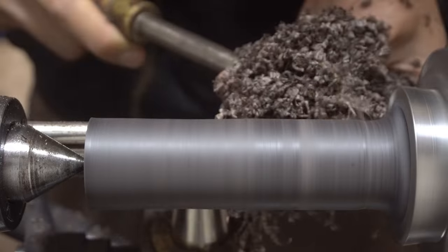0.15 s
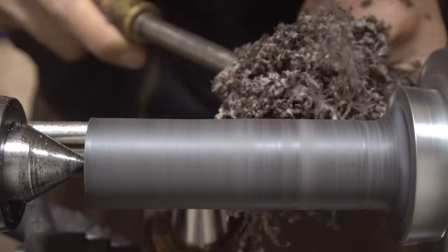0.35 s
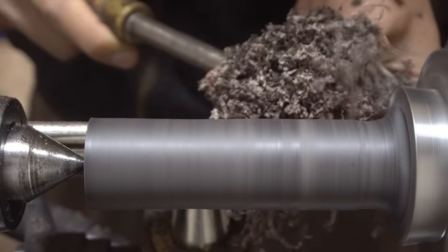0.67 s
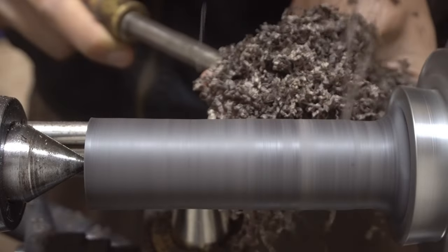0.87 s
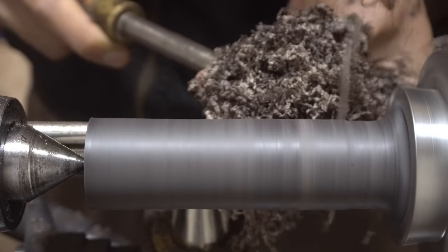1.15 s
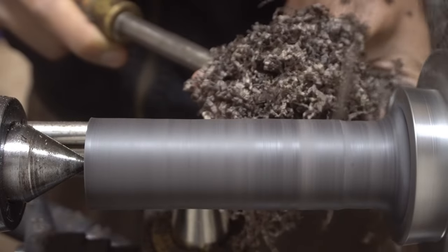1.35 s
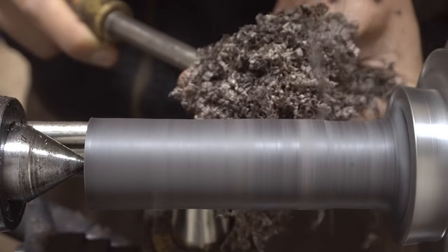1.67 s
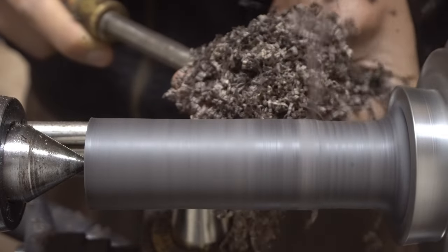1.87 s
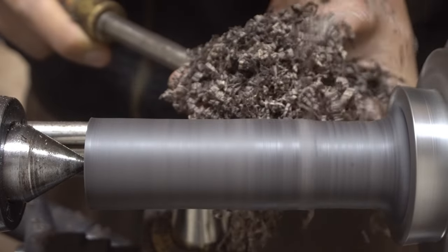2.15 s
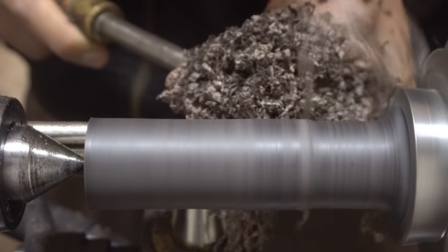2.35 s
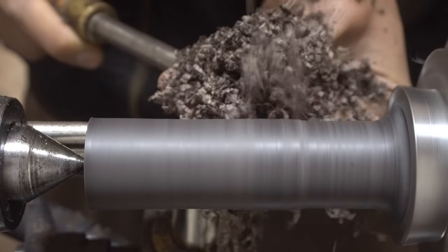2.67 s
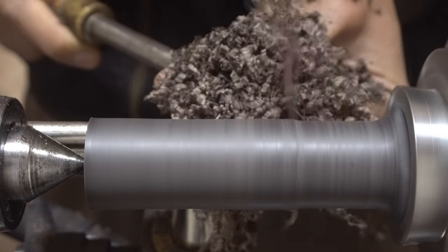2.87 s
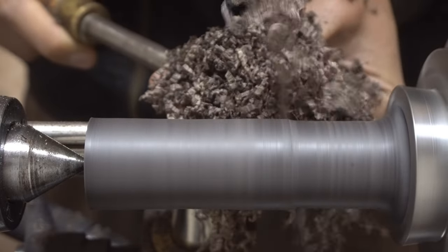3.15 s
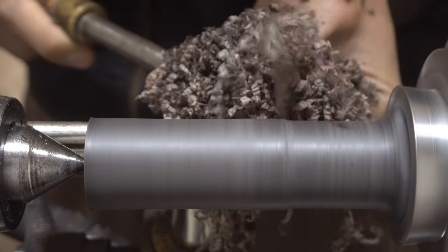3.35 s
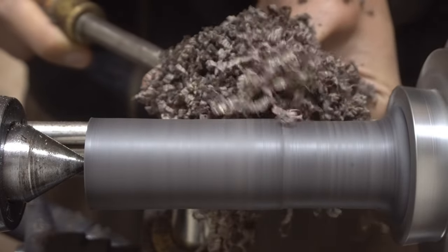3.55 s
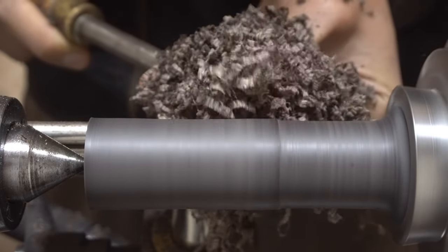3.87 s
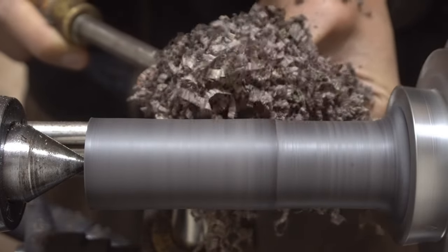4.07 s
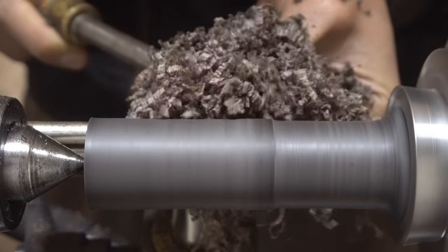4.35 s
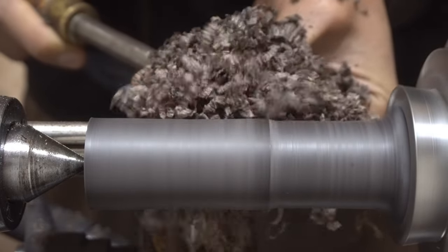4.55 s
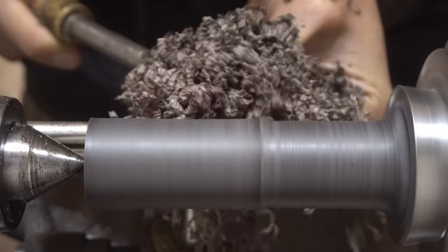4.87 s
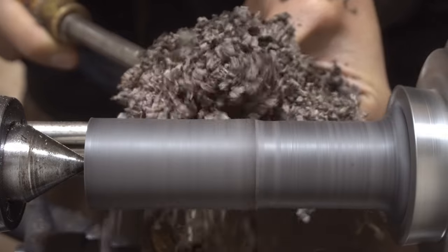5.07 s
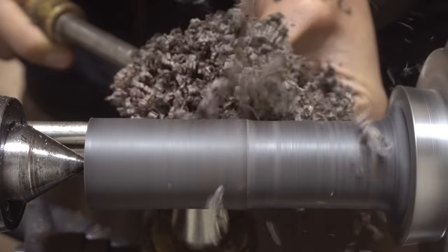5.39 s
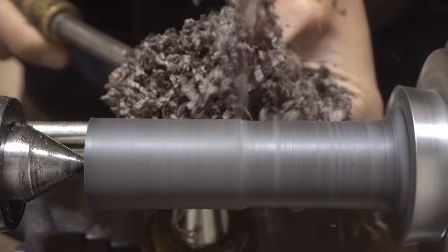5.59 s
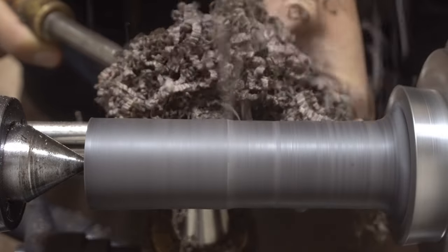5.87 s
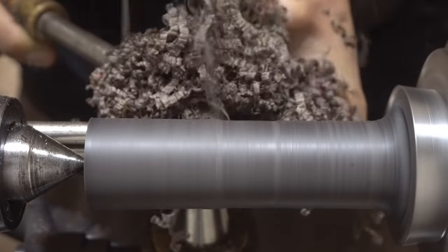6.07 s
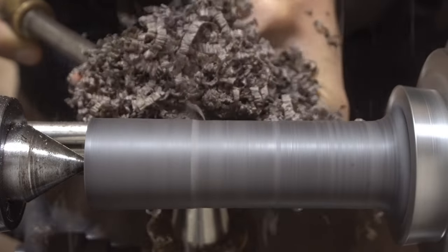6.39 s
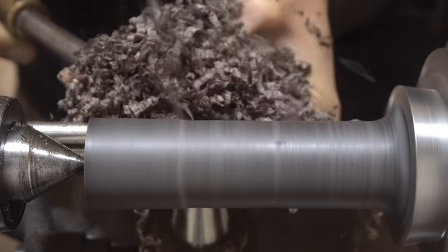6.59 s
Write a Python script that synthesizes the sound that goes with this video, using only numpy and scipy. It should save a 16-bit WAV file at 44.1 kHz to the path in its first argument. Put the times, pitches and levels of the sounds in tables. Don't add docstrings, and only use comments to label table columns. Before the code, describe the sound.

Close, piercing hiss of wood being turned on a lathe, with rapid buzzing crackle, wavering metallic whistles and a quiet low machine hum.

```python
import sys
import numpy as np
from scipy import signal
from scipy.fft import rfft, irfft
from scipy.io import wavfile
from scipy.ndimage import uniform_filter1d, map_coordinates

SR = 44100
rng = np.random.default_rng(int(sys.argv[2]) if len(sys.argv) > 2 else 0)


def log_audio(samples):
    frames = np.atleast_2d(samples).T
    limited = np.clip(frames, -1, 1)
    pcm = np.round(limited * 32767).astype(np.int16)
    wavfile.write(sys.argv[1], SR, pcm)


def linear_from_db(decibels):
    return 10 ** (np.asarray(decibels, float) / 20)


N = 296791
TIME = np.arange(N) / SR

# time_s, likeness_share (0-1)
LIKENESS = [(0, 0.44), (.32, 0.83), (1.28, 0.82), (1.6, 0.71), (2.7, 0.95), (3.1, 0.97), (4.16, 0.88),
            (4.75, 0.68), (4.96, 1), (5.76, 0.73), (6.24, 0.7), (6.73, 0.72)]
# time_s, place (0-4)
EDGE_PLACE = [(0, 0), (.9, 0), (1.35, 1), (2.1, 1), (2.7, 2), (4.4, 2), (4.58, 3), (5.5, 3), (6.0, 3.6),
              (6.45, 3.6), (6.65, 4), (6.73, 4)]


def curve(table):
    time_s, value = np.transpose(table)
    return np.interp(TIME, time_s, value)


def at_place(levels_db):
    return np.interp(curve(EDGE_PLACE), np.arange(len(levels_db)), levels_db)


def steady(x, span_s):
    span = int(span_s * SR)
    power = uniform_filter1d(uniform_filter1d(x ** 2, span), span)
    return x / np.sqrt(power + 1e-18)


def ring(x, hz, width_hz):
    return signal.lfilter(*signal.iirpeak(min(hz, .45 * SR), hz / width_hz, fs=SR), x)


def double_ring(x, hz, width_hz):
    return ring(ring(x, hz, width_hz), hz, width_hz)


def drone(hz, width_hz, span_s):
    return steady(double_ring(rng.standard_normal(N), hz, width_hz), span_s)


def walk(rate_hz):
    hold = int(SR / rate_hz)
    levels = np.repeat(rng.standard_normal(N // hold + 1), hold)
    return 1.985 * uniform_filter1d(uniform_filter1d(levels, hold), hold)[:N]


def bumps(table):
    return sum(db * np.exp(-.5 * ((TIME - s) / half_s) ** 2) for s, db, half_s in table)


def spell(start_s, length_s, fade_s):
    end_s = start_s + length_s
    span = slice(max(int((start_s - fade_s) * SR), 0), int((end_s + fade_s) * SR))
    to_edge_s = np.minimum(TIME[span] - start_s, end_s - TIME[span])
    return span, np.clip(to_edge_s / fade_s + .5, 0, 1)


def tones(rows, cycles, fade_s, waver_db, waver_rad, rate_hz):
    out, level, drift = np.zeros(N), walk(rate_hz), walk(1.3 * rate_hz)
    for (start_s, length_s, multiple, db), (turn, skip) in zip(rows, rng.random((len(rows), 2))):
        span, gate = spell(start_s, length_s, fade_s)
        own = (np.arange(N)[span] - int(skip * N)) % N
        wave = np.sin(2 * np.pi * (multiple * cycles[span] + turn) + waver_rad * drift[own])
        out[span] += np.sqrt(2) * linear_from_db(db + waver_db * level[own]) * gate * wave
    return out


def fan():
    # frequency_hz, density_db
    air_spectrum = [(30, -12), (60, -33), (150, -2), (300, -16), (400, -16), (800, -8), (1250, -13.5),
                    (2200, -12.5), (3500, -7), (8000, -13.5), (16000, -21.5)]
    hz, db = np.transpose(air_spectrum)
    shape = linear_from_db(np.interp(np.log(np.fft.rfftfreq(N, 1 / SR) + 1), np.log(hz), db))
    air = irfft(rfft(rng.standard_normal(N)) * shape, N)
    return air / air.std() * linear_from_db(-41)


def guard():
    # frequency_hz, width_hz, level_db
    guard_modes = [(59, 40, -51.5), (147.3, 22, -54), (310.5, 29.5, -57), (463.5, 11, -61.5),
                   (1252, 36, -56), (3375, 43, -51.5)]
    shake = rng.standard_normal(N)
    return sum(linear_from_db(db + 1.65 * walk(3.2)) * steady(double_ring(shake, hz, width_hz), 0.62)
               for hz, width_hz, db in guard_modes)


def panels():
    # start_s, length_s, frequency_hz, level_db
    buzzes = [(2.6, 0.4, 504, -58), (2.906, 0.5, 107, -45.5), (3.55, 0.64, 80.5, -51),
              (3.6, 0.35, 377, -57.5), (3.8, 0.39, 482, -59), (4.056, 0.31, 55, -46),
              (4.747, .5, 62.5, -51.5), (5.4, 0.58, 111, -47.5), (5.795, 0.14, 51.7, -45),
              (5.903, 0.99, 370, -62), (6.202, .6, 85.5, -49)]
    out = linear_from_db(-55 + 2.0 * walk(6)) * drone(233.5, 23, 0.094)
    for start_s, length_s, hz, db in buzzes:
        span, gate = spell(start_s, length_s, fade_s=0.1)
        out[span] += linear_from_db(db) * gate * drone(hz, 8.3, 0.058)[span]
    return out


def bench():
    # time_s, swell_db, half_width_s
    shudders = [
        (.01, 7.5, 0.13),
        (2.4, 3, 0.048),
        (3.25, 11, 0.31),
        (3.95, 4.5, 0.054),
        (4.2, 4, .1),
        (5.65, 4, 0.35),
        (6.4, -4, 0.32),
    ]
    # start_s, length_s, frequency_hz, level_db
    hums = [(-.1, 0.9, 249.3, -50), (.23, 0.077, 181, -33), (.35, 0.61, 173.1, -45.5),
            (.85, 0.38, 178, -61), (1.0, 1.48, 185.9, -41), (1.0, 0.71, 244, -47.5),
            (1.3, 0.4, 171.6, -46.5), (1.4, 0.93, 141, -62), (1.9, 0.54, 168.6, -47),
            (2.28, 0.14, 234, -47.5), (2.5, 0.31, 179.3, -53), (2.85, 0.5, 188.5, -39.5),
            (2.9, 0.4, 149, -51), (3.25, 0.29, 172.3, -46.5), (3.45, 0.32, 182, -42.5),
            (3.5, 1.12, 197, -46.5), (4.0, 0.42, 180.7, -43.5), (4.35, 0.5, 176.9, -44),
            (4.68, 0.26, 234, -48.5), (4.9, .8, 212, -56), (4.98, 0.84, 171.4, -39.5),
            (5.72, 0.554, 186, -41.5), (6.1, 0.45, 178.3, -43), (6.45, .4, 182, -44)]
    shudder_db = bumps(shudders)
    rumble = linear_from_db(shudder_db - 53 + 1.3 * walk(9)) * drone(101, 135, 0.076)
    rattle = linear_from_db(0.72 * shudder_db - 53.5 + .5 * walk(7)) * drone(604, 900, 0.14)
    boom = linear_from_db(-49 + 1.0 * walk(7.5)) * drone(180.5, 30, 0.092)
    hum = tones(hums, TIME, 0.086, waver_db=1.28, waver_rad=0.45, rate_hz=7.0)
    return hum + boom + rumble + rattle


def bearings():
    # frequency_hz, level_db
    whines = [(1211, -57.0), (1346, -56.0), (1685, -63), (2929, -54.5), (3095, -53.0), (7434, -48.0)]
    return sum(np.sqrt(2) * linear_from_db(db + 0.82 * walk(8.6)) * np.sin(2 * np.pi * hz * TIME + 0.53 * walk(8))
               for hz, db in whines)


def spindle_half_turns():
    # time_s, speed_rpm
    spindle_speed = [(0, 3467.5), (.48, 3466.8), (.96, 3465.6), (1.44, 3466.6), (1.92, 3468), (2.4, 3468.3),
                     (3.6, 3467.4), (4.32, 3468), (4.8, 3467.1), (5.28, 3467.7), (6.73, 3468)]
    return np.cumsum(curve(spindle_speed) / 30 / SR)


def bites():
    # time_s, jump_db
    force_jumps = [(0.3394, 0), (0.9692, -4), (1.25, -1), (1.487, -2), (1.6394, -1), (1.7294, 1),
                   (1.8244, 0), (2.0494, 2), (2.1644, 4), (2.5067, 7.5), (2.5425, 3), (3.6845, 5.5),
                   (3.7015, 3), (4.3734, 1), (4.5244, 6), (4.5764, 2), (4.6633, 6), (4.7434, -5),
                   (5.7954, 5), (5.898, 3), (6.0544, 1), (6.1489, 4), (6.2794, -2), (6.4494, -4),
                   (6.714, 2)]
    relax_s = 0.0087
    time_s, jump_db = np.transpose(force_jumps)
    kicks = np.zeros(N)
    kicks[(time_s * SR).astype(int)] = jump_db
    return signal.lfilter([1], [1, -np.exp(-1 / (relax_s * SR))], kicks)


def part_db(share):
    # time_s, hiss_db
    hand_pressure = [(0.0, -40), (0.06, -47), (0.11, -32), (0.35, -26.5), (0.6, -26), (1.1, -24.5),
                     (1.4, -21.5), (2.05, -23.5), (2.27, -28.5), (2.7, -24.5), (3.4, -25), (3.95, -30),
                     (4.12, -26.5), (4.5, -29), (4.9, -26), (5.5, -26.5), (5.9, -25), (6.73, -24)]
    # time_s, swell_db, half_width_s
    hand_surges = [(0.289, -4.5, 0.025), (0.569, 4.5, 0.019), (0.753, 4, 0.023), (0.828, 7, 0.027),
                   (1.033, 3.5, 0.022), (1.357, 3.5, 0.02), (1.616, -6, 0.012), (1.671, 2, 0.041),
                   (1.776, -5.5, 0.024), (1.851, 5, 0.024), (2.11, -3.5, 0.027), (2.415, 3, 0.075),
                   (2.519, 5, 0.016), (2.594, -3, 0.024), (3.143, -3, 0.023), (3.447, 2.5, 0.016),
                   (3.702, 3.5, 0.011), (4.385, 4, 0.012), (4.585, 4.5, 0.025), (4.689, 3.5, 0.052),
                   (4.744, 5, 0.013), (4.799, -6, 0.013), (5.742, -2, 0.022), (5.937, -3.5, 0.01),
                   (6.001, -5, 0.034), (6.111, -6, 0.02), (6.321, -4, 0.012), (6.455, 6, 0.014),
                   (1.512, 4, 0.011), (6.515, -1, 0.016)]
    # time_s, swell_db, half_width_s
    small_swells = [(0.156, -0.5, 0.025), (0.587, 1, 0.0092), (0.884, 1.5, 0.016), (1.141, -1, 0.012),
                    (1.363, 0.5, 0.025), (1.666, 0.5, 0.01), (1.922, -1.5, 0.018), (2.917, 0.9, 0.025),
                    (3.197, 0.1, 0.045), (3.488, -1, 0.041), (3.62, 1.5, 0.016), (3.718, -0.5, 0.025),
                    (4.177, -1, 0.021), (4.334, -1.5, 0.027), (4.572, 1, 0.016), (4.705, 0.5, 0.025),
                    (4.791, 2.2, 0.01), (4.897, -1, 0.016), (5.037, -2, 0.025), (5.134, -1.7, 0.021),
                    (5.585, 1, 0.028), (5.675, 2, 0.01), (6.12, -2.5, 0.016), (6.509, -1.5, 0.01),
                    (6.571, -2, 0.01), (6.722, -0.5, 0.012), (6.59, 0.5, 0.016), (6.655, 1, 0.018)]
    # time_s, roll_db
    gouge_roll = [(0, 3), (.6, 0.5), (1.0, -0.5), (1.5, 2.5), (1.85, -1), (2.05, 0), (2.5, -1.3),
                  (2.85, -1), (3.25, -0.1), (3.7, -0.5), (4.0, 1.5), (4.2, -3), (4.75, -1.2), (5.0, 0.5),
                  (5.6, 1), (6.1, 3), (6.5, -1), (6.73, -1)]
    surge_share, roll_share, *place_db = share
    surge_db = bumps(hand_surges) + bumps(small_swells)
    return curve(hand_pressure) + surge_share * surge_db + roll_share * curve(gouge_roll) + at_place(place_db)


def singing():
    shaft_multiples = [29, 60, 79, 74, 53, 30, 78, 52, 53, 29, 66, 60, 58, 31, 48, 78, 30, 36, 74, 65, 52,
                       53, 31, 35, 36, 60, 30, 52, 53, 29, 60, 35, 79, 52, 53, 78, 29, 79, 34, 78, 52, 36,
                       79, 50, 48, 70, 36, 53, 47, 61, 52, 80, 49, 90, 52, 47]
    # start_s, length_s, level_db (above the pressure)
    shaft_spells = [(0.01, 1.05, -20), (0.17, 0.72, -20), (0.23, 0.5, -18), (0.31, 0.46, -13),
                    (0.347, 0.78, -21.1), (0.47, 0.6, -23.5), (0.488, 0.62, -10.5), (1.15, 0.38, -11.5),
                    (1.55, 0.43, -11), (1.03, 1.35, -28), (1.033, 0.56, -17), (1.15, 1.02, -21.5),
                    (1.19, 0.5, -25), (1.416, 0.77, -22), (1.43, 0.63, -17.5), (1.51, 0.56, -13),
                    (1.53, 0.73, -46), (1.848, 0.51, -20.5), (1.67, 1.06, -22), (1.75, 0.59, -23.4),
                    (1.85, 0.6, -17.5), (1.91, 0.98, -18), (2.09, 0.66, -20.5), (2.21, 1.3, -19.5),
                    (2.35, 0.55, -21), (2.29, 0.58, -19), (2.347, 0.94, -33), (2.49, 0.7, -16.5),
                    (2.83, 0.67, -16), (2.85, 1.2, -22), (2.91, 0.99, -27), (3.07, 1.1, -23.5),
                    (3.11, 0.5, -16), (3.33, 0.87, -19.5), (3.39, 0.63, -14.5), (3.45, 0.99, -28),
                    (3.73, 0.88, -20), (3.89, 0.56, -13), (3.89, 0.99, -27), (4.25, 1, -26),
                    (4.433, 0.34, -16), (4.68, 0.61, -18.5), (4.67, 0.74, -14), (4.81, 0.45, -13),
                    (5.17, 0.74, -30), (5.35, 0.58, -12), (5.4, 0.8, -19), (5.69, 0.59, -18.5),
                    (5.73, 0.76, -19), (6.018, 0.48, -24), (0.42, 0.67, -17), (0.44, 0.24, -5.5),
                    (1.25, 0.25, -19), (0.64, 0.22, -16), (2.614, 0.19, -16), (6.22, 0.31, -17)]
    more_shaft_multiples = [36, 33, 31, 34, 32, 59, 52, 48, 40, 29, 29, 29, 35, 35, 31, 70, 34]
    # start_s, length_s, level_db (above the pressure)
    more_shaft_spells = [(6.25, 0.36, -13), (6.6, .3, -11), (6.58, .3, -13), (7.5, .3, -21), (6.6, .3, -14),
                         (6.5, .3, -15), (7.1, .25, -10), (5.85, 0.36, -12), (6.06, .3, -20), (1.14, 0.29, -17.5),
                         (4.2, 0.29, -17.5), (5.33, .3, -20.5), (1.56, 0.63, -25.5), (5.0, 1.08, -19.5),
                         (4.25, 0.56, -23.5), (5.3, .35, -22), (3.3, .8, -26)]
    edge_multiples = [112, 120, 97, 121, 120, 100, 112, 102, 131, 125, 111, 112, 121, 103, 90, 111, 112,
                      100, 125, 133, 90, 133, 126, 126, 126, 130, 131, 130]
    # start_s, length_s, level_db (above the pressure)
    edge_spells = [(0.29, 0.87, -16), (0.57, 0.51, -19), (1.09, 0.52, -13.5), (1.31, 0.51, -13),
                   (1.87, 0.45, -10), (1.89, 0.31, -21), (1.97, 0.64, -19.9), (2.01, 0.51, -13),
                   (2.01, 0.44, -14), (2.05, 0.29, -12), (2.25, 0.7, -16), (2.57, 0.64, -21),
                   (2.65, 0.46, -17.2), (2.75, 0.42, -17), (2.77, 0.54, -29), (3.15, 0.52, -19),
                   (3.65, 0.84, -15), (3.75, 0.48, -10), (4.05, 0.48, -18), (4.19, 0.42, -18),
                   (4.53, 1.3, -19), (4.71, 0.52, -14), (4.87, 0.38, -16), (5.55, 0.76, -17),
                   (2.9, 1.3, -16), (0.4, 1.4, -21), (2.5, 1.4, -12), (4.2, 1.1, -14)]
    rest_multiples = [11, 20, 14, 15, 11, 16, 15, 16, 11, 16, 11, 14, 15, 24, 15, 11, 21, 9, 16, 11, 24, 11,
                      11, 12]
    # start_s, length_s, level_db
    rest_spells = [(0.13, 1.1, -58), (0.27, 0.54, -52), (0.39, 0.94, -65), (0.512, 1.03, -53),
                   (0.85, 0.73, -49), (0.993, 0.76, -53), (1.35, 0.89, -56), (1.71, 0.71, -53.5),
                   (1.75, 1.2, -68), (2.47, 0.92, -52), (2.79, 0.98, -52.5), (3.07, 0.45, -62),
                   (3.09, 0.73, -50), (3.09, 0.6, -54), (3.83, 0.61, -49), (3.87, 0.95, -54),
                   (3.89, 0.76, -58), (4.03, 0.83, -56), (4.49, 0.34, -57.5), (4.89, 0.89, -48),
                   (5.13, 0.5, -52), (5.7, 0.6, -53), (6.383, .5, -46), (5.096, .9, -53)]

    def rows(multiples, spells):
        return [(start_s, length_s, k, db) for k, (start_s, length_s, db) in zip(multiples, spells)]

    half_turns, fade_s = spindle_half_turns(), 0.16
    shaft_rows = rows(shaft_multiples, shaft_spells) + rows(more_shaft_multiples, more_shaft_spells)
    edge_rows, rest_rows = rows(edge_multiples, edge_spells), rows(rest_multiples, rest_spells)
    shaft = tones(shaft_rows, half_turns, fade_s, waver_db=1.0, waver_rad=0.5, rate_hz=8.0)
    edge = tones(edge_rows, half_turns, fade_s, waver_db=2.2, waver_rad=1.0, rate_hz=11.0)
    rest = tones(rest_rows, half_turns, fade_s, waver_db=2.1, waver_rad=0.63, rate_hz=6.0)
    fresh = 1 - curve(LIKENESS)
    shaft_db = 0.47 * bites() + 4.5 * fresh * walk(28.15) + 1.03
    edge_db = 0.47 * bites() + 6.0 * fresh * walk(28.15) + 0.8
    hand = linear_from_db(part_db((1, .1, 0, 0, 0, 0, 0)))
    return hand * (linear_from_db(shaft_db) * shaft + linear_from_db(edge_db) * edge) + linear_from_db(-2.0) * rest


def renew(rows, memory):
    for k in range(1, len(rows)):
        rows[k] = memory[k] * rows[k - 1] + np.sqrt(1 - memory[k] ** 2) * rows[k]


def even_overtones(rows, power):
    lines = rfft(rows)
    rows[:] = irfft(lines / np.abs(lines) ** power, rows.shape[1])


def fibres():
    steps = 1024
    half_turns = spindle_half_turns()
    count = int(half_turns[-1]) + 2
    likeness = np.interp(np.arange(count), half_turns, curve(LIKENESS))
    shape = (3, count, steps)
    snaps = rng.standard_normal(shape) * linear_from_db(2.5 * rng.exponential(size=shape))
    ridge, figure = snaps[0], snaps[1]
    renew(ridge, np.clip(likeness / 0.884, .2, .98))
    renew(figure, np.full(count, 0.98))
    even_overtones(figure, 1.14)
    even_overtones(ridge, 0.4)
    snaps /= snaps.std(axis=(1, 2), keepdims=True)
    lean = 2.63 * walk(1.55)[::N // count][:count, None]
    angle = 2 * np.pi * np.arange(steps) / steps
    grain_db = 2.85 * np.cos(angle + lean) + 1.05 * np.cos(2 * angle - lean)
    grain_db = grain_db + 1.94 * np.cos(3 * angle + 2 * lean)
    snaps *= linear_from_db(grain_db)
    smooth = signal.sosfilt(signal.butter(12, .34, output="sos"), snaps.reshape(3, -1))
    shiver_s = 3e-6 * walk(70)
    place = steps * np.interp(TIME + shiver_s, TIME, half_turns)
    return [map_coordinates(row, [place], order=3, mode="nearest") for row in smooth]


def body(force, modes, skirt_db, flicker_db, fill_db):
    lag = int(8 * SR * 30 / 3467.5)
    low_hz, high_hz = modes[0][0], modes[-1][0]
    band = signal.butter(2, [.95 * low_hz, 1.05 * high_hz], "band", fs=SR, output="sos")
    out = linear_from_db(fill_db) * steady(signal.sosfilt(band, np.roll(force, 2 * lag)), .2)
    for k, (hz, width_hz, *place_db) in enumerate(modes):
        once = ring(np.roll(force, k % 2 * lag), hz, width_hz)
        skirt = (-1) ** k * linear_from_db(skirt_db) * once
        tone = steady(ring(once, hz, 1.11 * width_hz) + skirt, 0.094)
        out = out + tone * linear_from_db(at_place(place_db) + flicker_db * walk(6))
    return steady(out, 0.096)


def gouge():
    # frequency_hz, width_hz, then level_db at each of five places along the blank
    edge_modes = [(11350, 53, -3, -3.5, -5, -15, -10), (11760, 400, 1, 2.5, -0.5, -15.5, -10),
                  (12620, 210, -3, -10, -7, -1, -11), (12970, 260, -6, -7, 0, -4, -8),
                  (13500, 390, -8, -7, -10, -10, -5), (14040, 280, -4, -6, -1, -3, -5),
                  (14360, 350, -5, -9, -5, -2, -2), (14830, 350, -5, -6, 0, -1, -1),
                  (15060, 240, -6, -2, 2.5, 1.5, 4), (15430, 340, -5, -6, 1, 2.5, -10)]
    heel_modes = [(7540, 200, -12, -8, -3.5, -2.5, -1), (7960, 420, -2, -1.5, 1, -0.5, -6),
                  (8627, 230, -2, -1, -2.5, -5.5, -9), (9025, 364, 3.5, 3, 5.5, 3.5, 3.5),
                  (9710, 160, -9, -11, -3, -7, 0), (10460, 300, -11, -8, -3.5, 2, -2)]
    shaft_modes = [(5060, 160, -5, -7, -7.5, -6, -15), (5505, 200, -2.5, 1, -5, -2, 2),
                   (5768, 140, -3, -6, -6, -4, 0), (6064, 210, -6, 0, -3, -2.5, 0.5),
                   (6620, 170, -4, -6, -6, -3.5, -5), (6966, 164, -1, -3, -4, -1, -3)]
    blank_modes = [(2853, 270, -6, -11, -6, -6.5, -14), (3123, 150, 0, -22, -5.5, -12, -10),
                   (3376, 220, 9, 4, -2.5, -8, -2), (3466, 43, -11, 5, -2, -5, -11),
                   (3613, 150, 6.5, -5, -7, -5, 5), (3870, 234, -15, 1.5, -1, 0.5, 8.5),
                   (4104, 180, -11, -1, -0.5, 0.5, 3), (4610, 240, 2, -3, -5, -3.5, 2)]
    # frequency_hz, width_hz, level_db
    rest_modes = [(954, 75, -61), (1039, 49, -58), (1254, 130, -60), (1430, 45, -65.5), (1618, 59, -55.5),
                  (1725, 45, -55.5), (1839, 24, -59), (2417, 260, -55)]
    # surge_share, roll_share, then level_db (above the pressure) at each of five places
    edge_share = (0.91, -0.36, 0.11, 0.09, 0.63, -0.31, -0.46)
    heel_share = (1, 0.74, -5, -6, -5, -5.5, -4)
    shaft_share = (1.36, 1.05, -12.5, -12.5, -10, -8.5, -5)
    blank_share = (0.52, -0.5, -17.5, -16.5, -14.5, -13, -7)
    ridge, figure, chips = fibres()
    fine = ridge + 0.65 * figure + 0.57 * chips
    middle = ridge + 0.44 * figure + 0.18 * chips
    coarse = ridge + 1.05 * figure + 0.14 * chips
    grip_db = 0.24 * walk(14)
    shares = (edge_share, heel_share, shaft_share, blank_share)
    edge_db, heel_db, shaft_db, blank_db = (part_db(s) + grip_db + 0.33 * walk(4.84) for s in shares)
    edge = linear_from_db(edge_db) * body(fine, edge_modes, skirt_db=-11.0, flicker_db=0.7, fill_db=3.0)
    heel = linear_from_db(heel_db) * body(middle, heel_modes, skirt_db=-9.5, flicker_db=1.8, fill_db=-3.0)
    shaft = linear_from_db(shaft_db) * body(coarse, shaft_modes, skirt_db=-15.5, flicker_db=1.5, fill_db=-5.0)
    blank = linear_from_db(blank_db) * body(coarse, blank_modes, skirt_db=-9, flicker_db=1.04, fill_db=-4.5)
    rest = sum(linear_from_db(db + 0.52 * walk(3.86)) * steady(double_ring(coarse, hz, width_hz), 0.3)
               for hz, width_hz, db in rest_modes)
    flutter_db = 2.05 * (1 - curve(LIKENESS)) * walk(45)
    bite_db = bites()
    tip = linear_from_db(flutter_db + bite_db) * (edge + heel)
    stem = linear_from_db(0.88 * bite_db) * (shaft + blank)
    return tip + stem + rest * linear_from_db(0.076 * (blank_db + 39.5))


def scene():
    return (fan() + guard() + panels() + bench() + bearings() + singing() + gouge())[None]


def top_cut(x):
    return signal.sosfilt(signal.butter(12, 17010, fs=SR, output="sos"), x)


def record(dry):
    headroom = 0.88
    rounded = headroom * np.tanh(dry / headroom)
    x = signal.sosfilt(signal.butter(2, 50, "high", fs=SR, output="sos"), rounded)
    x = signal.sosfilt(signal.ellip(16, .3, 90, 15725, fs=SR, output="sos"), x)
    return top_cut(x)


dry = scene()
out = record(dry)
log_audio(out)
```